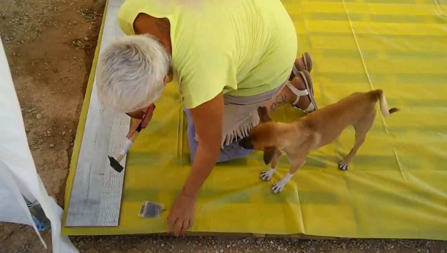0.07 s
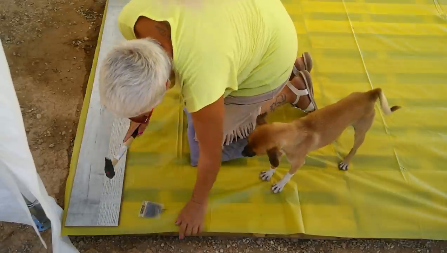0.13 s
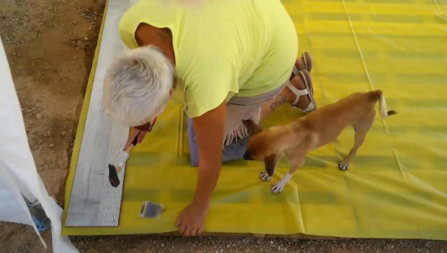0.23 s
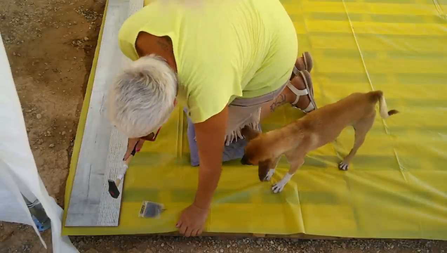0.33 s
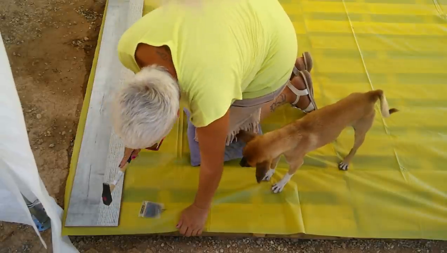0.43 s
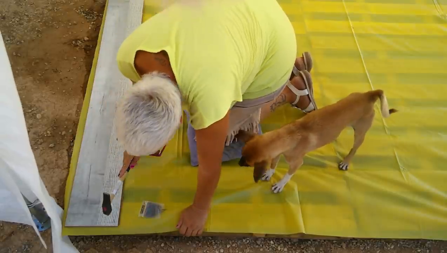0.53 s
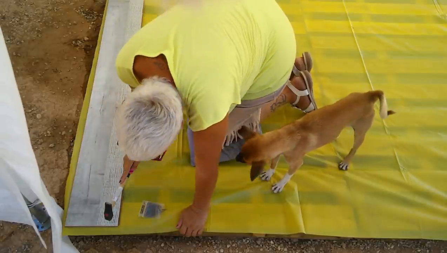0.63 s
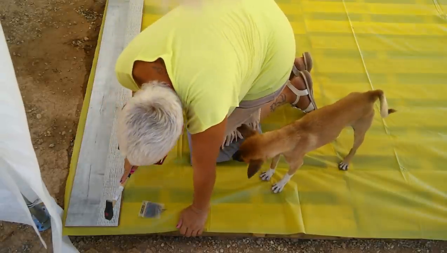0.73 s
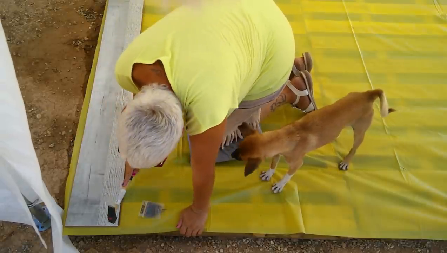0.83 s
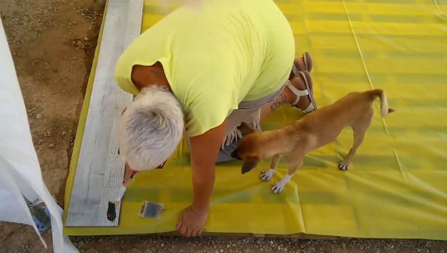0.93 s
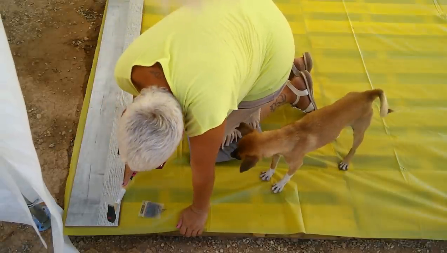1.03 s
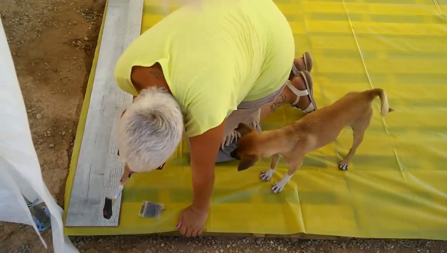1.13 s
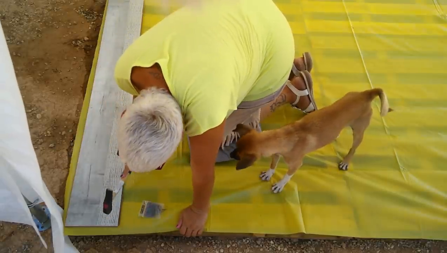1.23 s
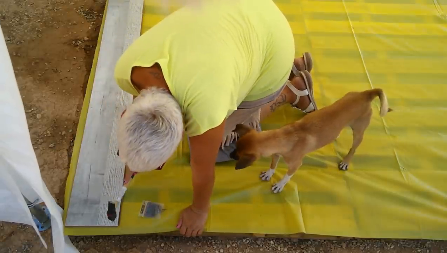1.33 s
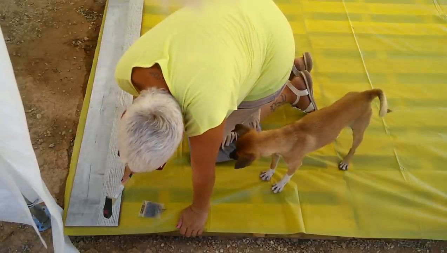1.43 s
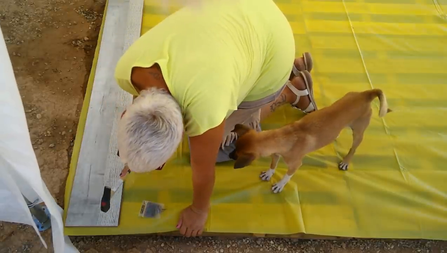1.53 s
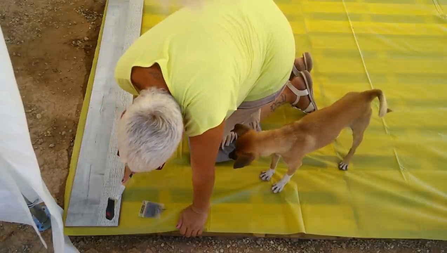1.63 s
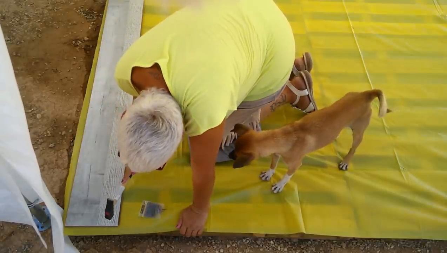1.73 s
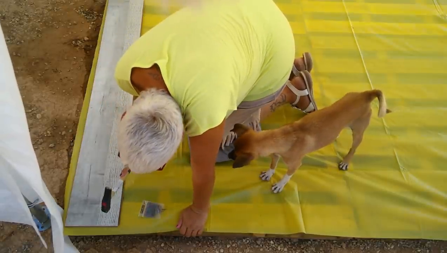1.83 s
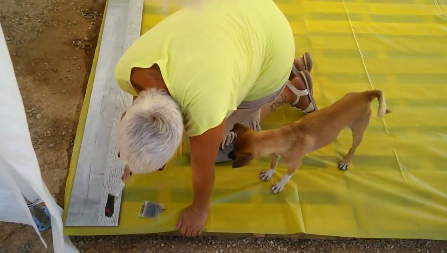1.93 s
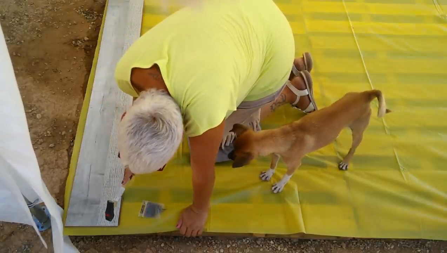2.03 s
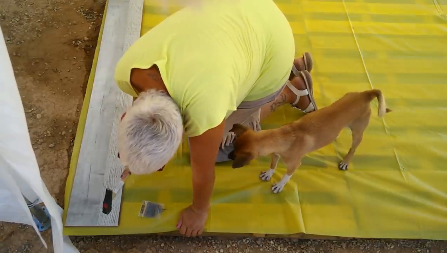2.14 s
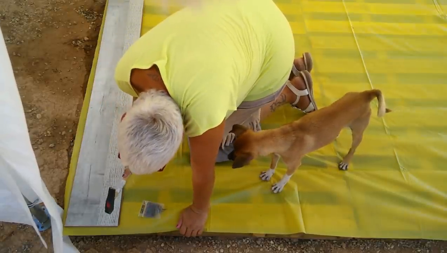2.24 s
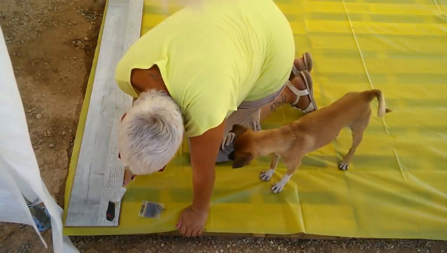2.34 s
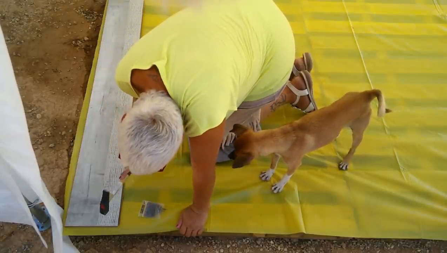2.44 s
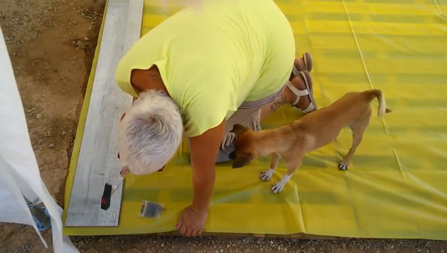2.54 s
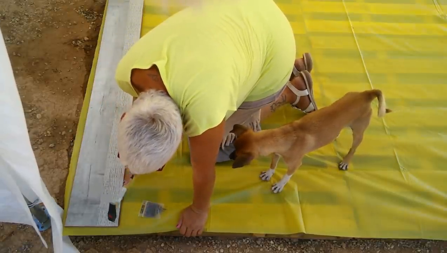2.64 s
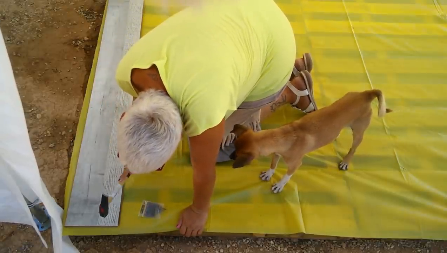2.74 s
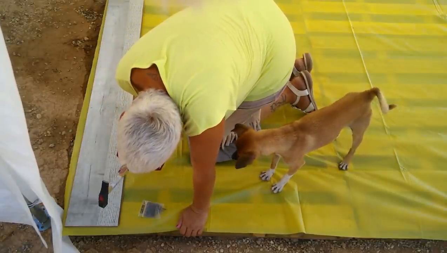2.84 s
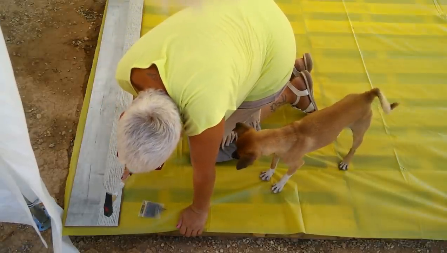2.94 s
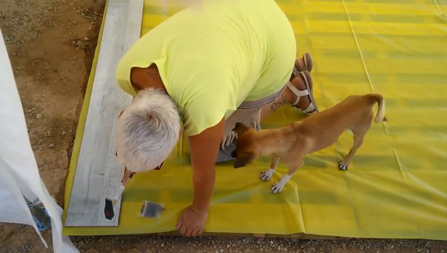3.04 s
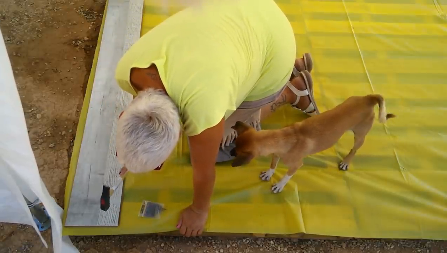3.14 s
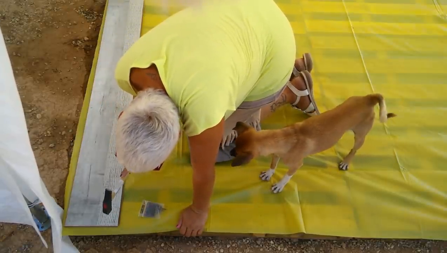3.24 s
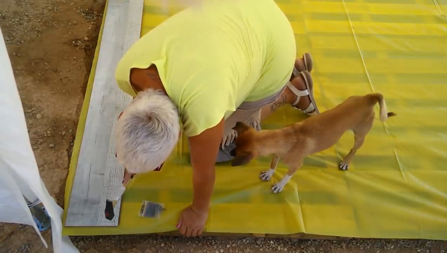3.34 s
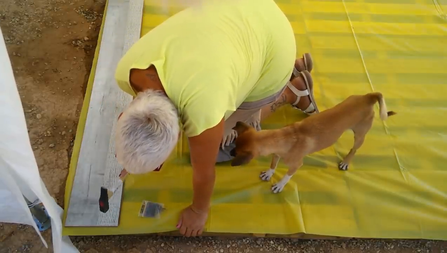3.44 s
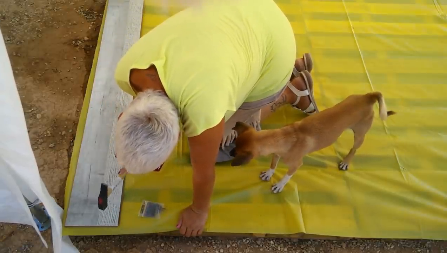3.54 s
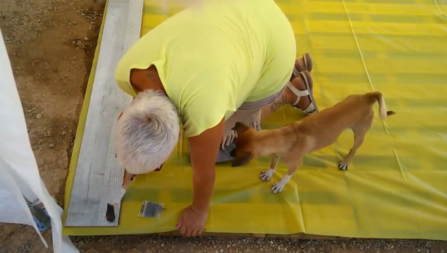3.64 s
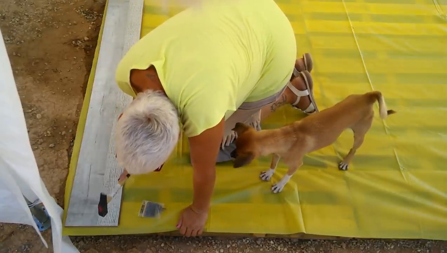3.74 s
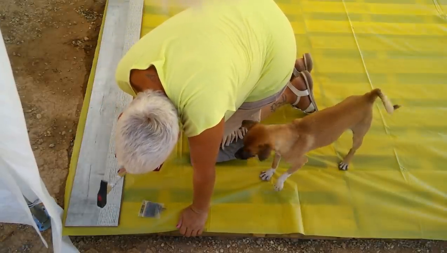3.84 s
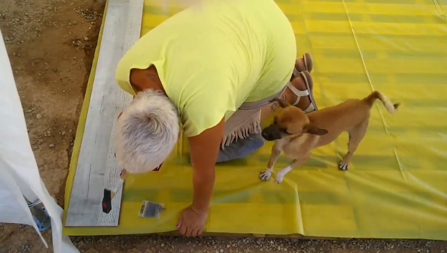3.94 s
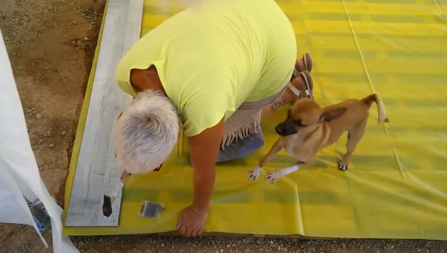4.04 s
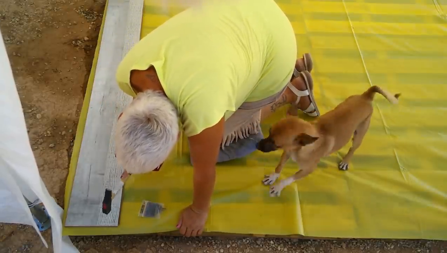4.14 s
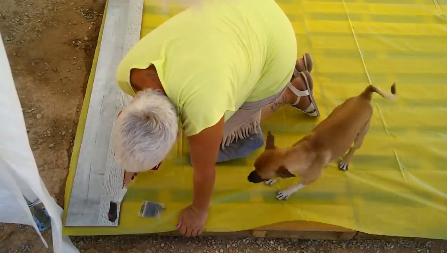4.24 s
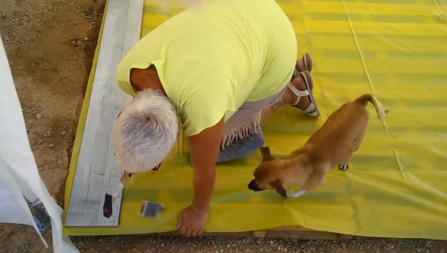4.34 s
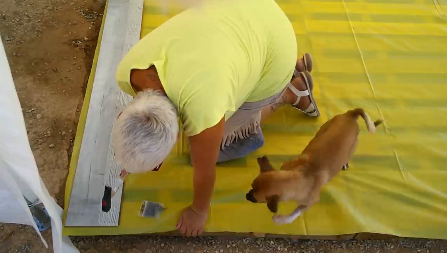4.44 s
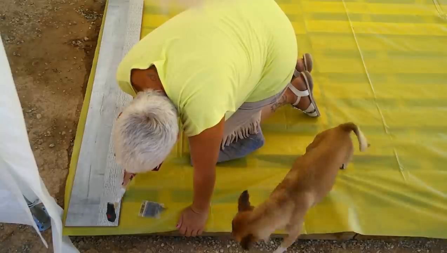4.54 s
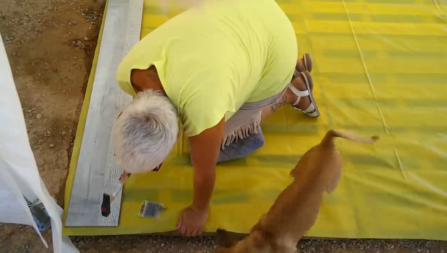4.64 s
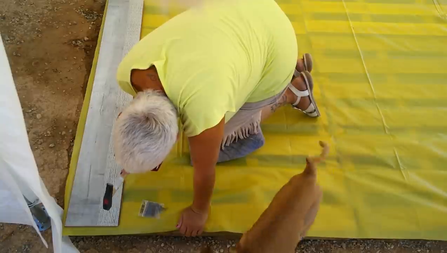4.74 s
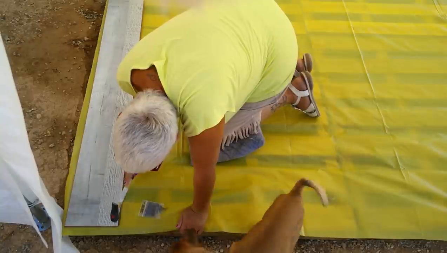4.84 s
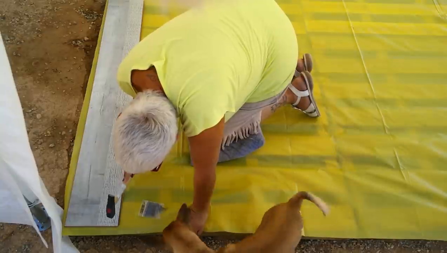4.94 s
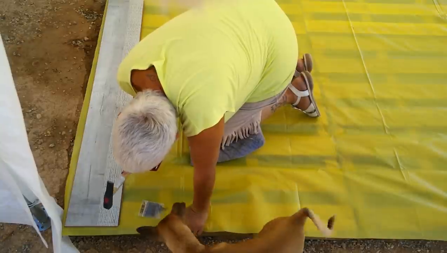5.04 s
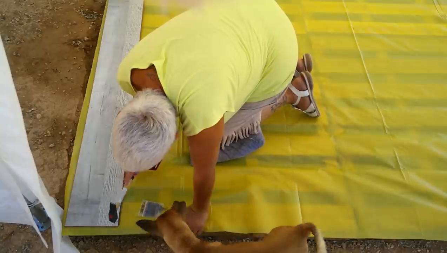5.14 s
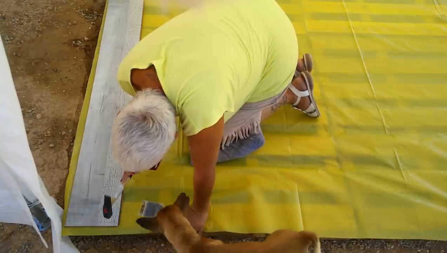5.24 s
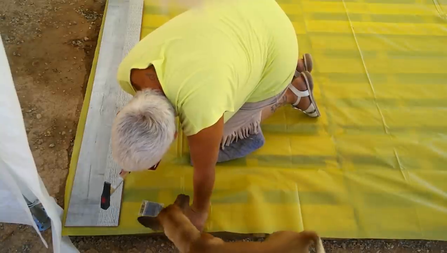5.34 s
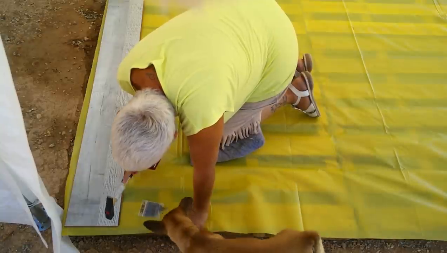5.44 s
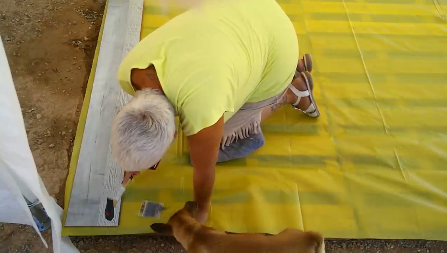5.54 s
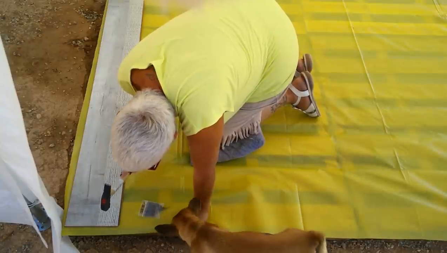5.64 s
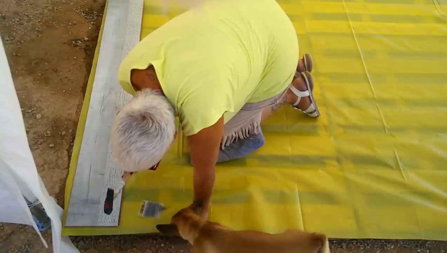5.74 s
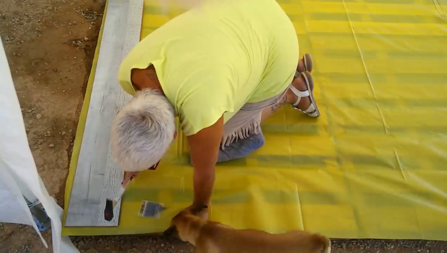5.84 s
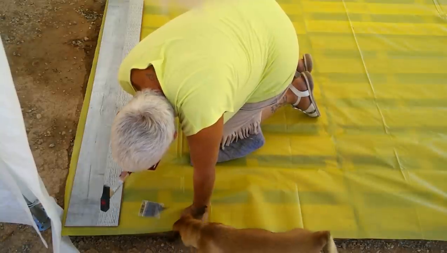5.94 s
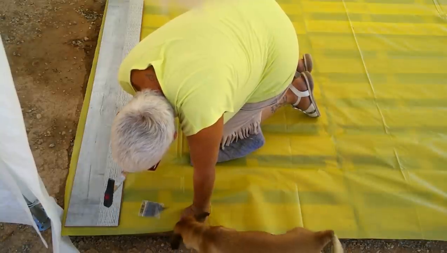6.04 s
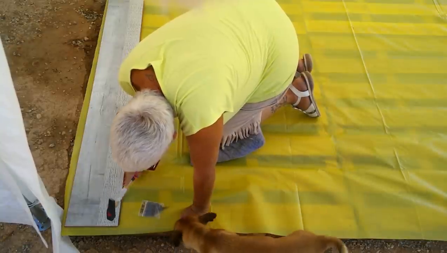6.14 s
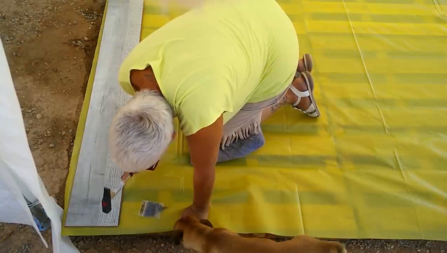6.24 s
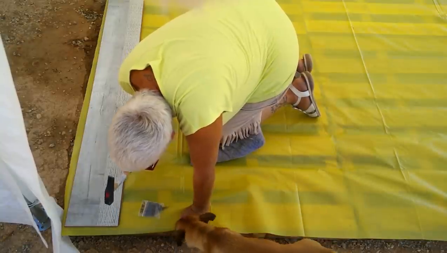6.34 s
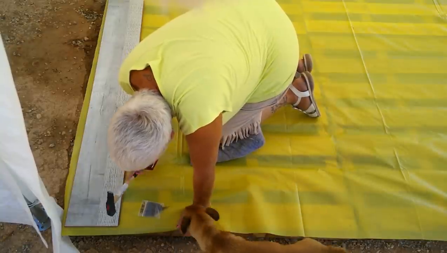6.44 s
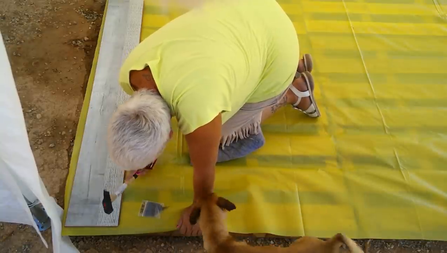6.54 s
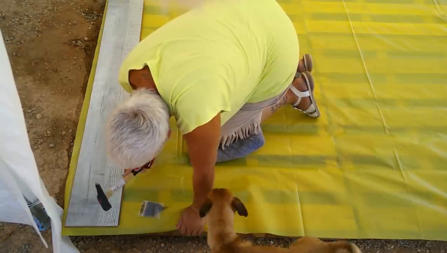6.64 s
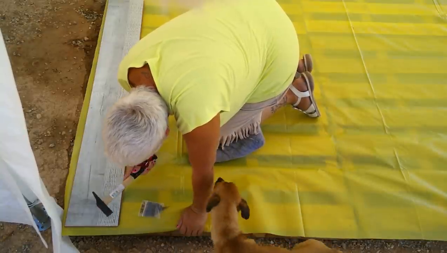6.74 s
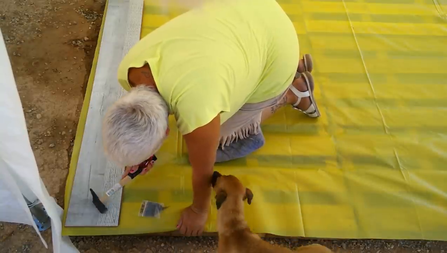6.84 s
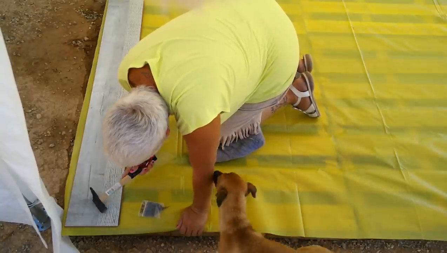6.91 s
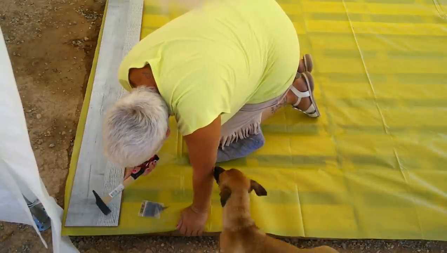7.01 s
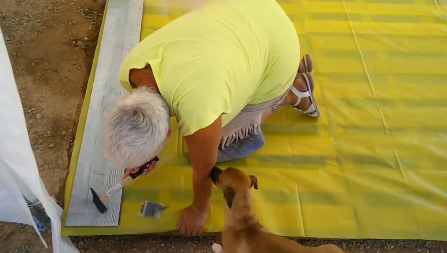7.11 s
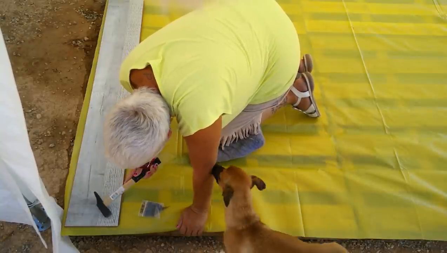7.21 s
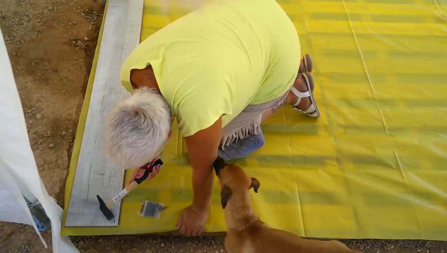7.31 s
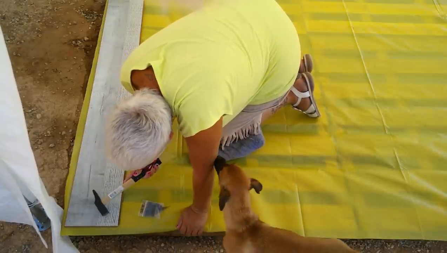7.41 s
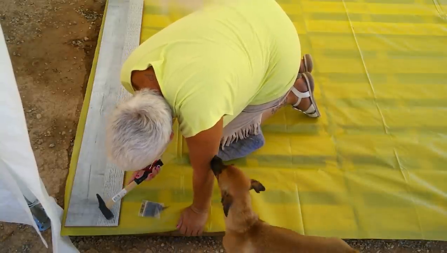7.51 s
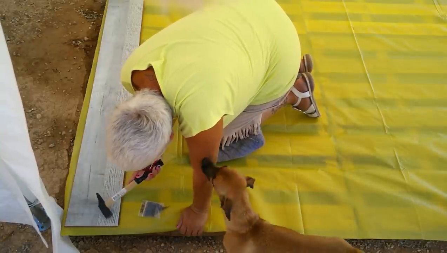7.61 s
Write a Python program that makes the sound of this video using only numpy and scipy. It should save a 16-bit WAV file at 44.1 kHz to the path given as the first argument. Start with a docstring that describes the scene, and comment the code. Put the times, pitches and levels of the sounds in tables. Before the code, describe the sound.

In a quiet outdoor tent, a hammer drives a nail into a wooden plank with nine quick, even blows that grow louder. After a brief pause with faint scraping, seven hard blows sink a second nail, and two lighter taps follow. Each blow makes the board crack and ring over a low drone, and the hardest slightly overload the microphone. A tarpaulin rustles faintly now and then.

```python
"""Under a tent, a hammer drives two nails into a long plank lying on a tarpaulin, then taps it lightly.
Each blow rings the board and leaves a low drone; the hard ones overload the camera's microphone.
The wood cracks louder as a nail sinks, and the last blow on each crunches its head into the board.
At the second nail the hammer scrapes over the wood. The tarpaulin rustles now and then;
far from the microphone a bird pips in a quiet outdoor hush."""
import sys
import numpy as np
from scipy import signal
from scipy.fft import rfft, irfft, next_fast_len
from scipy.io import wavfile
from scipy.ndimage import map_coordinates

SR = 44100
rng = np.random.default_rng(int(sys.argv[2]) if len(sys.argv) > 2 else 0)


def waveform_to_disk(signal):
    """Save audio, clipped to [-1, 1], as 16-bit WAV at the path in sys.argv[1]."""
    frames = np.transpose(np.atleast_2d(signal))
    scaled = np.clip(frames, -1, 1) * 32767
    samples = np.round(scaled).astype(np.int16)
    wavfile.write(sys.argv[1], SR, samples)


N = 338247

# hammer blows: (time [s], force [dB], nail [0 or 1])
HAMMER_BLOWS = [(1.0944, -15, 0), (1.409, -6.5, 0), (1.7299, -5.5, 0), (2.0367, -2.5, 0), (2.368, -3, 0),
                (2.6982, -2.5, 0), (3.0347, -3.5, 0), (3.3515, -2.5, 0), (3.6847, 0, 0), (4.2526, -0.5, 1),
                (4.5888, -1.5, 1), (4.8978, -1.5, 1), (5.199, -0.5, 1), (5.5174, -0.5, 1), (5.8415, -1, 1),
                (6.1736, 0, 1)]
# the plank's bending modes: (frequency [Hz], level at first nail [dB], at second nail [dB], t60 [s])
PLANK_MODES = [(188, -17, -15, 0.089), (217, -15, -12, 0.069), (257.2, -12, -13.5, 0.16),
               (322.4, -22, -11.5, 0.1), (358.5, -7.5, -7.5, .12), (398.3, -15.5, -12, 0.18),
               (461, -5.5, -2, 0.1), (526, 4.5, 3.5, 0.082), (577.6, -8.5, -9, .17),
               (616, -5.5, -10.5, 0.1), (773, -1, -2, 0.09), (825.5, -4.5, -7, 0.12),
               (922.6, 3.5, 3.5, 0.073), (1031.7, 0, 1, 0.079), (1124.4, -4, -2.5, 0.075),
               (1207, -5.5, -4.5, 0.025), (1324, 0, -1, 0.054), (1615, -3.5, -7, 0.03),
               (1843, -4, -7, 0.057), (2160, 1.5, 2, .05), (2336, 1.5, 4.5, 0.05), (2560, 0.5, 3.5, .055),
               (3013, 0, 0, .055)]
# wood cracking under a nail: (frequency [Hz], level [dB per Hz])
CRACK_SPECTRUM = [(40, -29), (150, -7), (500, -1.5), (1100, -0.5), (2300, 2), (3200, 0), (4200, -1),
                  (8000, -5.5), (12000, -24.5)]


def amp(db):
    """Decibels to gain."""
    return 10 ** (np.asarray(db) / 20)


def unit(x):
    """x at rms 1."""
    return x / np.sqrt(np.mean(x ** 2) + 1e-20)


def along(points, hz):
    """(Hz, value) points read on a log frequency axis."""
    knots_hz, values = np.transpose(points)
    return np.interp(np.log(hz + 1), np.log(knots_hz + 1), values)


def filtered(x, response):
    """x through a filter whose gain is response(hz)."""
    size = next_fast_len(len(x) + SR // 4)
    return irfft(rfft(x, size) * response(np.fft.rfftfreq(size, 1 / SR)), size)[:len(x)]


def coloured(x, points):
    """x through a minimum-phase filter with the given (Hz, dB) curve."""
    size = 2 ** 12
    cepstrum = irfft(np.log(amp(along(points, np.fft.rfftfreq(size, 1 / SR)))))
    cepstrum[1:size // 2] *= 2
    cepstrum[size // 2 + 1:] = 0
    impulse = irfft(np.exp(rfft(cepstrum)))
    return signal.fftconvolve(x, impulse)[:len(x)]


def noise(spectrum, size):
    """Coloured noise of rms 1."""
    return unit(filtered(rng.standard_normal(size), lambda hz: amp(along(spectrum, hz))))


def wobble(knots_per_s):
    """A smooth random curve."""
    knots = rng.standard_normal(int(N * knots_per_s / SR) + 4)
    return map_coordinates(knots, [np.arange(N) * knots_per_s / SR])


def add(track, s, sound):
    """Mix a sound into the track at time s."""
    part = track[round(s * SR):][:len(sound)]
    part += sound[:len(part)]


def strokes(rows, attack_s, release_t60):
    """Gain of (time [s], length [s], level [dB]) strokes: each rises, holds and dies away."""
    gain, t = np.zeros(N), np.arange(N) / SR
    for s, length, db in rows:
        fall_db = 60 * np.maximum(t - s - length, 0) / release_t60
        gain += amp(db - fall_db) * np.clip((t - s) / attack_s, 0, 1)
    return gain


def friction(spectrum, slips_per_s, clump_db):
    """Tiny random slips that come in clumps, at rms 1."""
    slips = rng.standard_normal(N) * (rng.random(N) < slips_per_s / SR)
    clumps = amp(clump_db * wobble(70))
    return unit(coloured(slips * clumps, spectrum))


def outdoor_hush(level_db=-54.5, sway_db=1.9):
    """The quiet, nearly steady air around the tent."""
    # the hush: (frequency [Hz], level [dB per Hz])
    spectrum = [(12, -29), (20, -5), (58, -6.5), (193, -12), (222, -16), (400, -18), (718, -19),
                (1660, -26), (2390, -29), (4810, -52.5), (7520, -43), (16000, -74)]
    return amp(level_db + sway_db * wobble(1.3)) * noise(spectrum, N)


def tarpaulin_rustle():
    """The tarpaulin crinkles under knees and paws."""
    # movements on the sheet: (time [s], length [s], level [dB])
    rustles = [(.125, .055, -51.5), (.27, .06, -53), (3.96, 0.058, -54.5), (6.51, .12, -56.5),
               (7.56, 0.022, -50)]
    # its crinkle: (frequency [Hz], level [dB per Hz])
    spectrum = [(200, -9), (900, -2), (1500, 1), (1900, -4), (2200, 3), (2600, -6), (4500, -6.5),
                (7500, -8), (12000, -17)]
    gain = strokes(rustles, attack_s=0.021, release_t60=0.13)
    return gain * friction(spectrum, slips_per_s=2600, clump_db=3.0)


def far_bird(pitch_hz=1865, level_db=-62, glide=0.045):
    """Short, slightly rising whistles, faint with distance."""
    # the bird's pips: (time [s], length [s])
    pips = [(.43, 0.037), (.47, 0.052), (.66, 0.044), (.72, 0.059)]
    out = np.zeros(N)
    for s, length in pips:
        progress = np.arange(round(length * SR)) / (length * SR)
        hz = pitch_hz * (1 + glide * (progress - .5))
        swell = amp(level_db) * np.sin(np.pi * progress)
        add(out, s, swell * np.sin(2 * np.pi * np.cumsum(hz) / SR))
    return out


def hammer_contact(sound, corner_hz):
    """The hammer rebounds like a mass on a spring: a longer, softer contact excites less treble."""
    return filtered(sound, lambda hz: 1 / (1 + np.sqrt(2) * 1j * hz / corner_hz - (hz / corner_hz) ** 2))


def plank_ring(t, nail, vary_db, damping=1, travel_s=.0016, attack_s=.0007):
    """The plank's modes, struck near a nail; bending waves are dispersive, so the low ones arrive last."""
    hz, first_db, second_db, t60 = np.transpose(PLANK_MODES)[:, :, None]
    db = (second_db if nail else first_db) + vary_db * rng.standard_normal(hz.shape)
    slowness = np.sqrt(np.median(hz) / hz)
    age = np.maximum(t - travel_s * (slowness - slowness.min()), 0)
    sign = (-1) ** np.arange(len(hz))[:, None]
    envelope = amp(db - 60 * damping * age / t60) * (1 - np.exp(-age / attack_s))
    return np.sum(sign * envelope * np.sin(2 * np.pi * hz * age), 0)


def tent_tail(t, build_s=0.018):
    """The diffuse answer of tent and ground to a knock."""
    # the tail's colour: (frequency [Hz], level [dB per Hz])
    spectrum = [(50, -10), (130, -2.5), (400, 13), (900, 2.5), (1400, -6.5), (2200, -1), (3200, -7.5),
                (4200, -8), (8000, -2.5), (12000, -19.5)]
    # its decay: (frequency [Hz], t60 [s])
    decay = [(100, 0.27), (300, 0.11), (900, .15), (2500, 0.18), (7000, 0.2)]
    hz, s, bands = signal.stft(noise(spectrum, len(t)), SR, nperseg=256)
    fade = amp(-60 * s / along(decay, hz)[:, None])
    _, tail = signal.istft(bands * fade, SR, nperseg=256)
    return tail[:len(t)] * (1 - np.exp(-t / build_s))


def wood_crack(t, crack_db=13, t60=0.021, rise_s=0.0022, echo_db=-11, echo_s=0.01, tent_db=-3):
    """The wood's dense crack, its return from the plank's far end, and its tail under the tent."""
    burst = lambda age: amp(crack_db - 60 * age / t60) * (1 - np.exp(-age / rise_s))
    direct = noise(CRACK_SPECTRUM, len(t)) * burst(t)
    dulled = hammer_contact(noise(CRACK_SPECTRUM, len(t)), corner_hz=2900)
    echo = amp(echo_db) * dulled * burst(np.maximum(t - echo_s, 0))
    return direct + echo + amp(tent_db) * tent_tail(t)


def blows_on(nail):
    """The (time [s], force [dB]) of the blows that drive one nail."""
    return [(s, db) for s, db, which in HAMMER_BLOWS if which == nail]


def nailing(ring_db=-6.5, crack_start_db=0.62, crack_db_per_blow=0.23, crack_db_per_db=0.9):
    """Each blow rings the plank; the wood cracks louder as it grips more of the nail."""
    full_blow_hz, octaves_per_db = 1780, 0.0475  # treble corner: lighter blows are brighter
    out, t = np.zeros(N), np.arange(SR // 2) / SR
    for nail in range(2):
        spot = wood_crack(t)  # blows on one nail share a spot on the board, so they sound alike
        for count, (s, force_db) in enumerate(blows_on(nail)):
            ring = amp(force_db + ring_db) * plank_ring(t, nail, vary_db=1.5)
            crack = np.sqrt(0.5) * (spot + wood_crack(t))
            crack_db = crack_start_db + crack_db_per_db * force_db + crack_db_per_blow * count
            corner_hz = full_blow_hz * 2 ** (-octaves_per_db * force_db)
            add(out, s, hammer_contact(ring + amp(crack_db) * crack, corner_hz))
    return out


def low_drone(level_db=-1.05, db_per_force_db=0.62, attack_s=0.0036):
    """Each blow excites low resonances, which last into the next one."""
    # the droning resonances: (frequency [Hz], level [dB], t60 [s])
    resonances = [(70.3, -38, 3), (100, -28.5, 0.6), (139.44, -20, 0.41), (155.9, -38.5, 1.1),
                  (197, -45, 0.58), (280, -49, 1.3)]
    out, t = np.zeros(N), np.arange(2 * SR) / SR
    drone = sum(amp(db - 60 * t / t60) * np.sin(2 * np.pi * hz * t) for hz, db, t60 in resonances)
    drone *= 1 - np.exp(-t / attack_s)
    for s, force_db, _ in HAMMER_BLOWS:
        add(out, s, amp(level_db + db_per_force_db * force_db) * drone)
    return out


def nail_head_crunch(levels_db=(-21.5, -34.5), length_s=0.029):
    """The last blow on each nail presses its head into the board and crushes the fibres."""
    crunches = [(blows_on(nail)[-1][0], length_s, db) for nail, db in enumerate(levels_db)]
    gain = strokes(crunches, attack_s=.004, release_t60=0.18)
    return gain * friction(CRACK_SPECTRUM, slips_per_s=2100, clump_db=2.0)


def wood_jerk(t, pitch_hz=1100, t60=0.0046, lag_s=0.00064):
    """The wood right under the hammer jerks once, before the board's ring builds up."""
    age = np.maximum(t - lag_s, 0)
    return amp(-60 * age / t60) * np.sin(2 * np.pi * pitch_hz * age)


def tapping(ring_db=-8, jerk_db=12, tick_db=-30, low_cut_hz=600):
    """Light touches meet the soft wood itself, die quickly and hardly move the whole board."""
    # taps and bumps of the hammer: (time [s], force [dB], contact corner [Hz])
    taps = [(3.882, -51, 3350), (3.969, -32, 870), (4.178, -35, 3240), (4.2125, -20, 2500),
            (4.223, -21.5, 2900), (4.238, -23.5, 2405), (4.383, -37, 2300), (4.408, -32, 2200),
            (4.44, -36.5, 3323), (4.491, -22.5, 1113), (4.815, -43, 2870), (6.78, -52.5, 3220),
            (6.838, -54, 2600), (6.91, -14.5, 1390), (7.2536, -16.5, 1260), (7.571, -42.5, 1380)]
    out, t = np.zeros(N), np.arange(SR // 2) / SR
    for s, force_db, corner_hz in taps:
        ring = amp(ring_db) * plank_ring(t, nail=1, vary_db=2.5, damping=1.4)
        crack = wood_crack(t, crack_db=12.5, t60=0.039, tent_db=1)
        knock = ring + amp(jerk_db) * wood_jerk(t) + crack
        # the yielding wood cushions the contact a second time; only a faint tick escapes
        cushioned = hammer_contact(hammer_contact(knock, corner_hz), corner_hz)
        add(out, s, amp(force_db) * (cushioned + amp(tick_db) * knock))
    return filtered(out, lambda hz: 1j * hz / (low_cut_hz + 1j * hz))


def hammer_scrape():
    """The hammer head slides over the board in tiny slips."""
    # the slides: (time [s], length [s], level [dB])
    slides = [(4.2, .05, -35), (4.365, .09, -39), (4.46, .125, -41), (4.85, .045, -45)]
    # the head rubbing on wood: (frequency [Hz], level [dB per Hz])
    spectrum = [(80, -13.5), (400, 8), (1000, 4), (2400, -5.5), (4000, -10.5), (7500, -15), (12000, -29)]
    gain = strokes(slides, attack_s=0.022, release_t60=.2)
    return gain * friction(spectrum, slips_per_s=1800, clump_db=2.5)


def scene():
    """The work under the tent, coloured by the microphone's port, with the far bird and the hush."""
    # response of the microphone's port: (frequency [Hz], gain [dB])
    microphone = [(30, -4), (90, 5), (3350, 0), (4000, -11.5), (5000, -18.5), (6200, -15), (7600, -5.5),
                  (8500, -10.5), (9200, -36.5)]
    work = hammer_scrape() + tarpaulin_rustle() + nailing() + nail_head_crunch() + low_drone() + tapping()
    return (coloured(work, microphone) + far_bird() + outdoor_hush())[None]


def record(dry, ceiling=0.69, hardness=12, top_hz=16300):
    """The microphone input overloads on every hard blow; the recorder then dulls the top octave."""
    # the recorder's treble response: (frequency [Hz], gain [dB])
    treble = [(7200, -0.5), (8300, -6.5), (9000, -18), (11000, -16), (16000, -8.5)]
    clipped = dry[0] / (1 + np.abs(dry[0] / ceiling) ** hardness) ** (1 / hardness)
    band_limit = lambda hz: 1 / (1 + (hz / top_hz) ** 80)
    return filtered(clipped, lambda hz: amp(along(treble, hz)) * band_limit(hz))[None]


dry = scene()
out = record(dry)
waveform_to_disk(out)
```